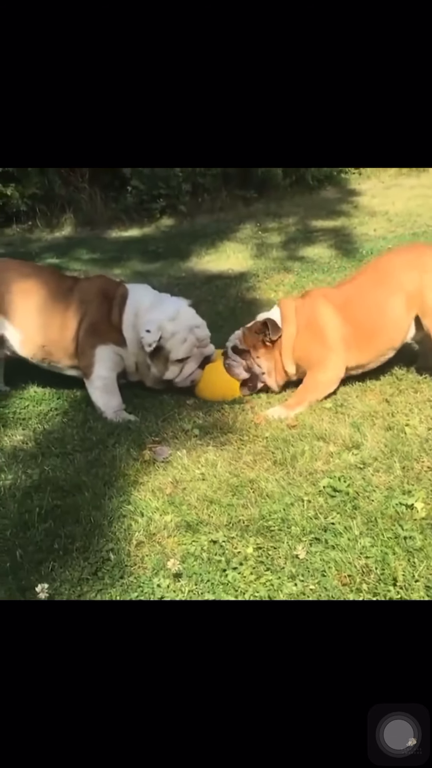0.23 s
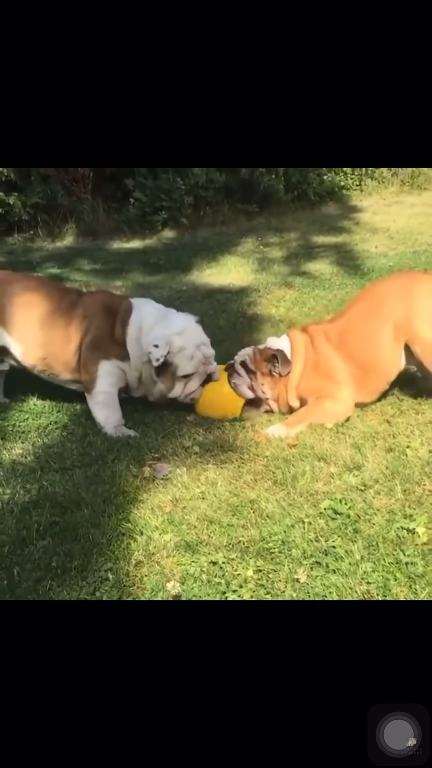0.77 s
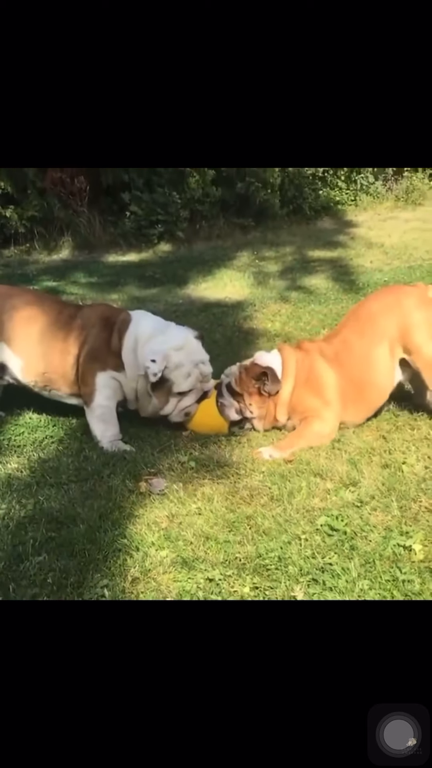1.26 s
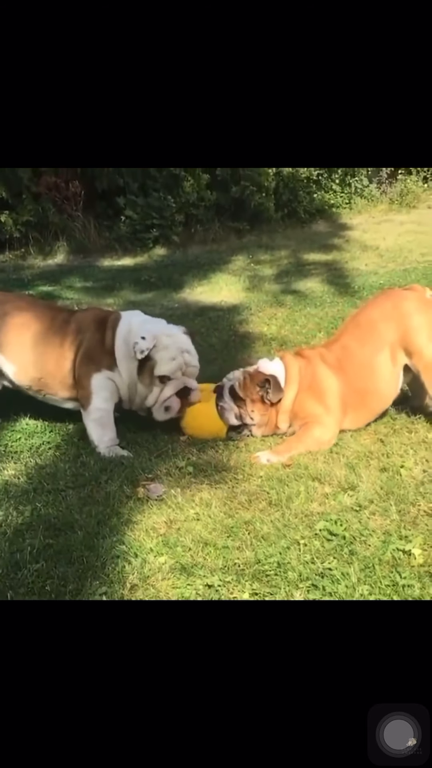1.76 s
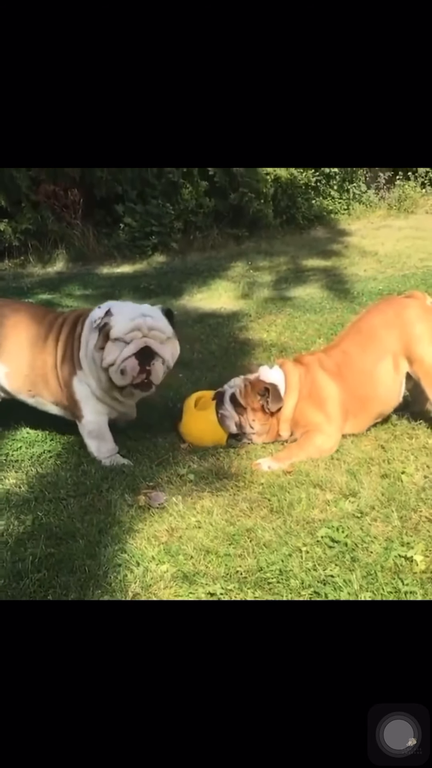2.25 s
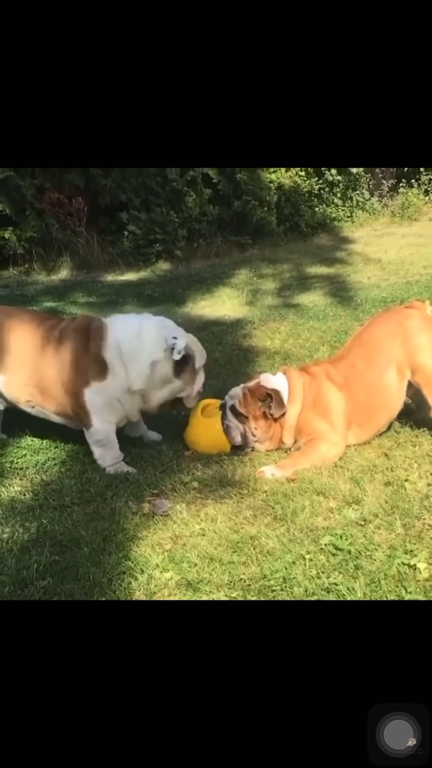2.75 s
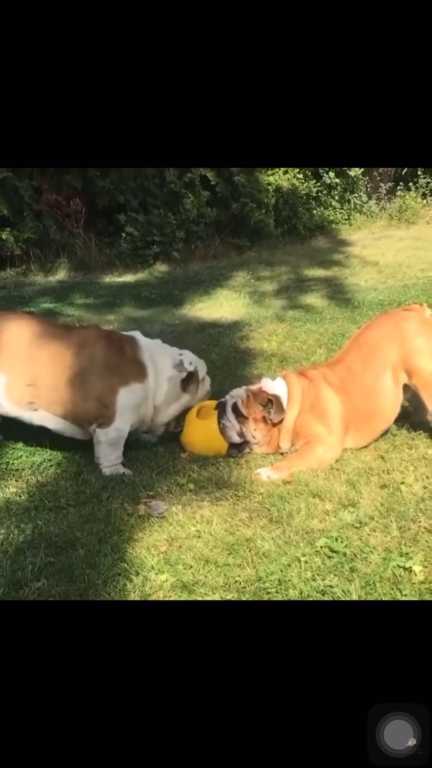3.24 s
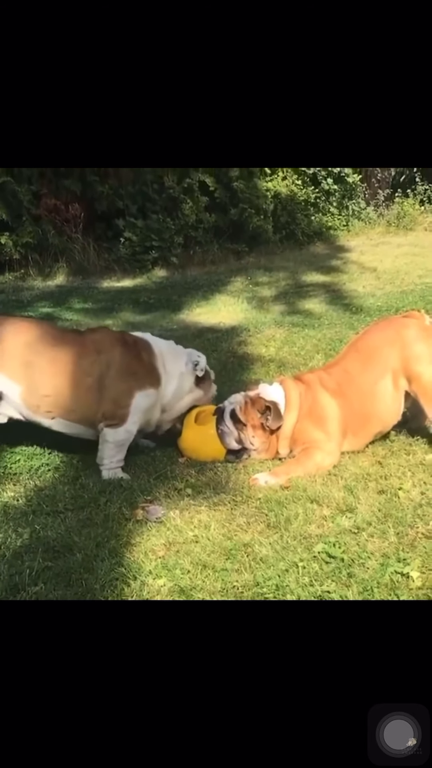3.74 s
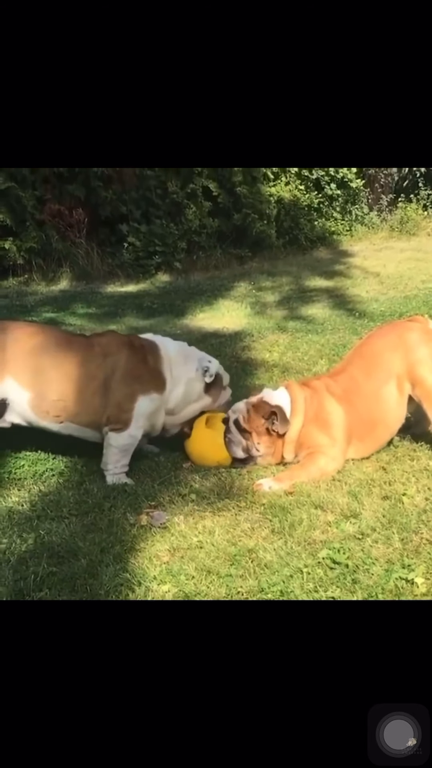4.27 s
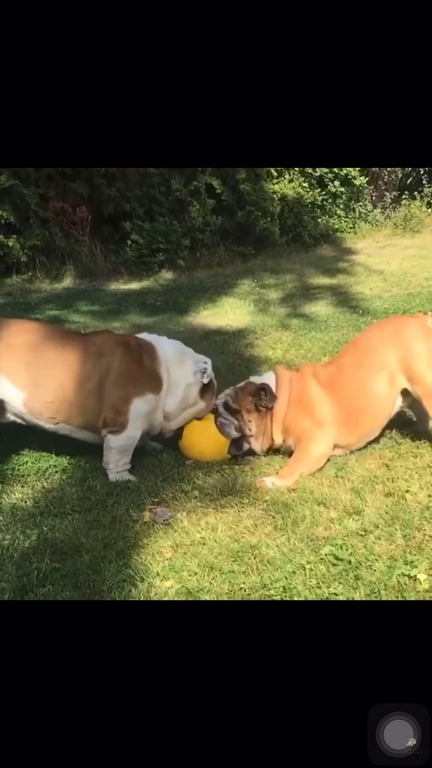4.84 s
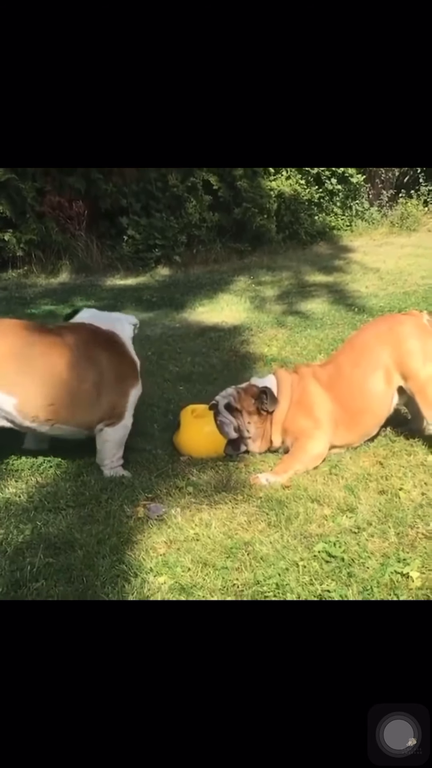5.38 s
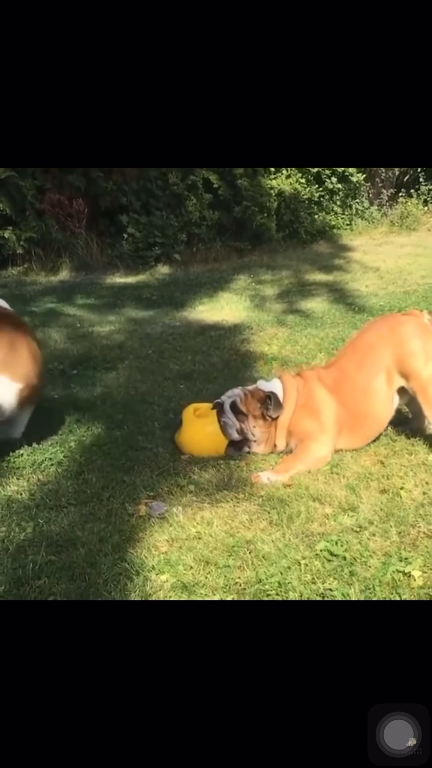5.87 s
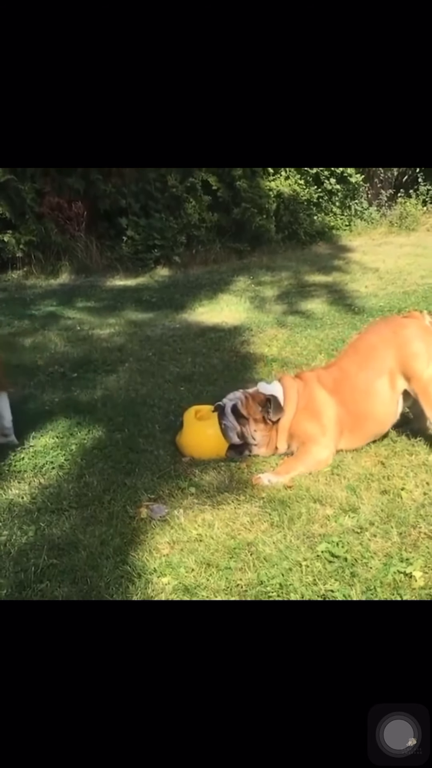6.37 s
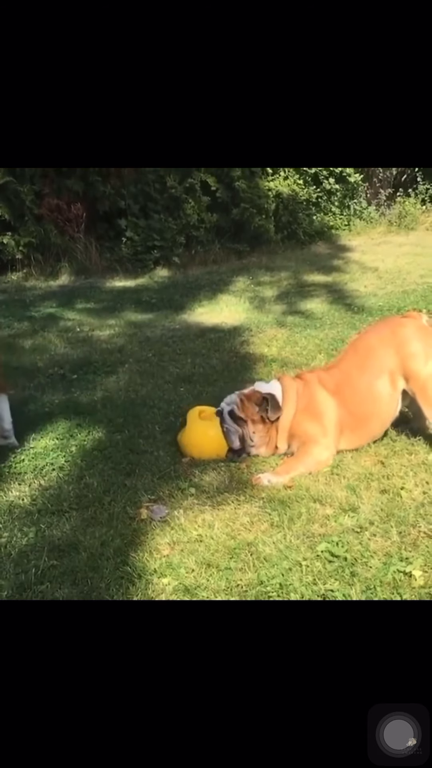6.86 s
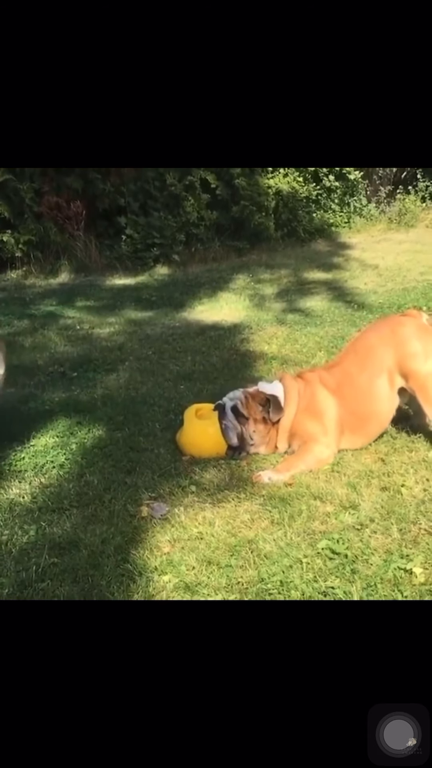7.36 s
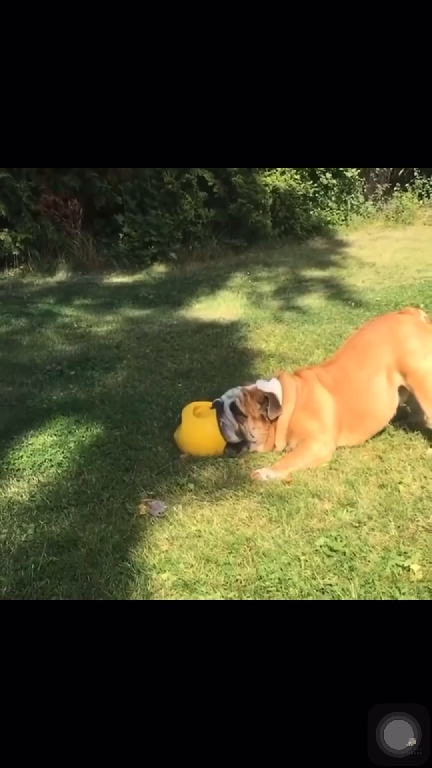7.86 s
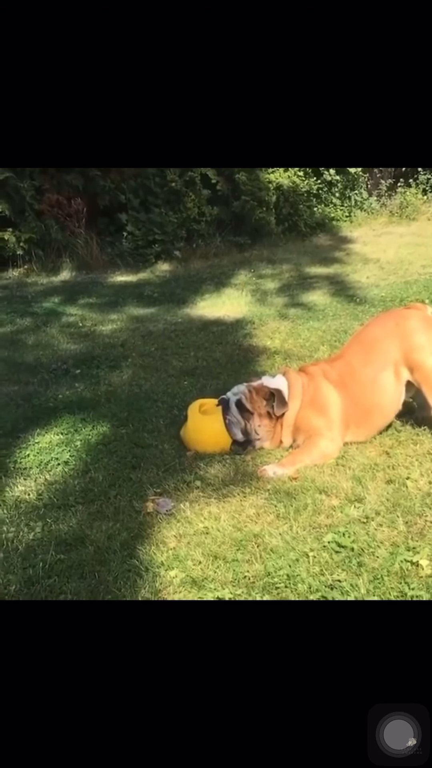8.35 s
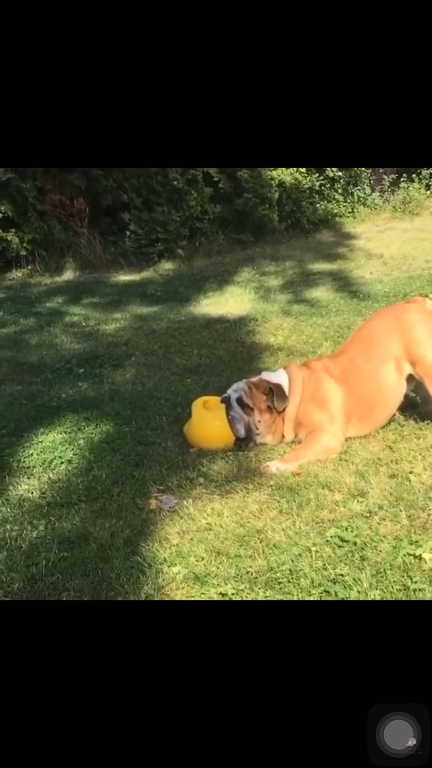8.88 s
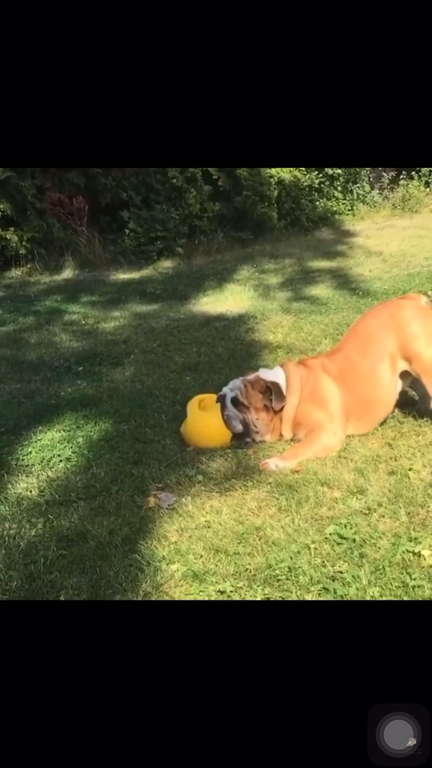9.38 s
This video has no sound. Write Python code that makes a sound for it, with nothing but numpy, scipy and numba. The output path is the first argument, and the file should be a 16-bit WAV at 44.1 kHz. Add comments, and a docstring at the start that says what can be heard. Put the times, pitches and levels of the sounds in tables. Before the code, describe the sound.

Two stocky dogs tussle over a hollow plastic ball on grass. Slow fluttering growls, wet huffs and nasal snorts come in quick bursts, with a gruff bark near the start and another midway. Short ringing teeth knocks punctuate them. The growling thins out after six seconds, then a strong growl and more snuffling return. Fairly close, dry outdoor pickup over a faint low garden rumble.

```python
"""A huff and a slow, fluttering growl come first, over a quiet garden: two bulldogs tussle over a hollow ball.
Growls are trains of throat slaps that excite chest and throat resonances, with air escaping around them.
Huffs and snorts are turbulence filtered by mouth and nose; wheezes are narrow gliding resonances.
Two gruff barks are ragged pulses and gated air in a changing mouth. Short ringing knocks are teeth on the ball
and some single hard slaps of the throat; grass crackles in proportion to the growling effort."""
import sys
import numpy as np
from scipy import signal
from scipy.fft import rfft, irfft
from scipy.io import wavfile
from scipy.ndimage import uniform_filter1d
from numba import njit

SR = 44100
rng = np.random.default_rng(int(sys.argv[2]) if len(sys.argv) > 2 else 0)


def wav_out(sig):
    """Save sig, one row per channel (or a flat mono array), as 16-bit PCM at SR to the path in sys.argv[1]."""
    wavfile.write(sys.argv[1], SR, np.round(np.clip(np.atleast_2d(sig).T, -1, 1) * 32767).astype(np.int16))


N = 424241
TIME = np.arange(N) / SR  # seconds

# Spectrum of the garden air. Each row: frequency in Hz, relative density in dB.
GARDEN_SPECTRUM = [(15, -34), (25, -6.5), (144, -1), (213, -17.5), (403, -22), (448, -28), (846, -18.5),
                   (1070, -18.5), (1260, -23), (1360, -22.5), (1680, -29.5), (12600, -41.5), (14000, -43)]
GARDEN_DB = -59.5  # mean level, about which the air wanders
GRASS_DB = -22.5  # relative to the growling effort

# Short ringing knocks: teeth on the ball, and some single hard slaps of the throat.
# Each row: start in seconds, peak level in dB before a common +2.5 dB, main ring in Hz.
SHORT_KNOCKS = [(0.49, -34.5, 890), (0.639, -31.5, 2070), (0.726, -36, 678), (0.771, -41.5, 2150),
                (1.211, -47.5, 640), (1.354, -36.5, 710), (1.379, -41.5, 750), (2.264, -51, 615),
                (2.754, -33.5, 572), (2.844, -33, 970), (2.907, -37, 2220), (3.271, -30.5, 2270),
                (3.336, -39, 2120), (3.756, -30, 1970), (4.341, -47, 620), (4.91, -47, 920),
                (4.947, -40, 910), (5.013, -33, 897), (5.534, -52, 644), (5.588, -34, 2320),
                (5.668, -37.5, 635), (5.926, -53.5, 584), (7.124, -28, 736), (7.591, -41, 637),
                (8.947, -33.5, 1150), (9.178, -38, 995), (9.212, -34.5, 964), (9.312, -34.5, 934)]
# Resonances that every knock shares. Each row: frequency in Hz, width in Hz, gain in dB.
KNOCK_MODES = [(683, 96, -3), (1760, 180, -12.5), (2054, 73, -6), (2750, 66, -12), (4150, 170, -69)]

# Wheezes of a pinched airway. Each row: start in seconds, end in seconds, frequency at the start in Hz,
# frequency at the end in Hz, level in dB.
AIRWAY_WHEEZES = [(0.94, 1.058, 680, 640, -52), (1.859, 1.966, 2120, 1750, -50), (2.5, 2.54, 830, 830, -45),
                  (2.994, 3.07, 2040, 1940, -61.5), (3.795, 3.829, 2050, 1730, -45),
                  (3.801, 3.867, 1310, 1340, -47), (4.236, 4.318, 1763, 1470, -54),
                  (4.271, 4.413, 1315, 1000, -49), (4.504, 4.63, 972, 895, -58),
                  (4.533, 4.683, 596, 537, -61), (8.413, 8.508, 1126, 1220, -43),
                  (9.49, 9.602, 1180, 1120, -48.5)]

# Huffs through mouth and nose. Each row: start, crest and end in seconds, mouth level and nose level in dB
# before chopping and mixing, first, second and third mouth resonance in Hz, strength of the first in dB.
BREATH_HUFFS = [(.01, 0.103, 0.21, -45.5, -44, 710, 1920, 3320, 4.5),
                (0.24, 0.296, 0.48, -56.5, -62, 880, 2200, 3250, 1.5),
                (0.444, 0.476, 0.6, -49.5, -58, 1030, 2120, 3400, 5.5),
                (0.56, 0.643, .77, -42.5, -48.5, 1070, 2080, 3450, 2),
                (0.857, 0.959, 1.062, -44.5, -43, 690, 1910, 3050, 2),
                (1.271, 1.376, 1.81, -65, -68, 800, 1342, 3090, 1.5),
                (1.849, 1.95, 2.026, -47, -53.5, 670, 2200, 3160, 1.5),
                (2.092, 2.173, 2.37, -59, -67.5, 440, 1800, 2300, -7),
                (2.464, 2.548, 2.596, -44, -48.5, 1130, 2250, 3200, 5),
                (2.594, 2.695, 2.908, -55.5, -41, 1050, 2040, 3380, 2),
                (2.89, 2.875, 3.08, -63, -68, 1050, 2040, 3040, -4),
                (3.094, 3.37, 3.57, -47, -63, 930, 1670, 2870, -11.5),
                (3.598, 3.64, 3.69, -49, -60, 660, 1550, 2910, -22),
                (3.699, 3.753, 3.88, -43.5, -53, 830, 1560, 2770, -7),
                (3.943, 4.06, 4.15, -55.5, -69.5, 650, 1500, 3620, -9.5),
                (4.135, 4.275, 4.43, -52, -69, 450, 1620, 2230, -0.5),
                (4.534, 4.705, 4.86, -55, -56, 1100, 1480, 2200, 2),
                (4.823, 4.843, 5.3, -55, -64, 924, 1780, 3400, 1.5),
                (5.33, 5.357, 5.62, -55.5, -58.5, 960, 2100, 3470, 1.5),
                (5.525, 5.626, 5.765, -47, -49, 770, 2220, 3300, -7),
                (5.925, 5.98, 6.67, -65, -68.5, 930, 2267, 3360, -1),
                (6.924, 6.986, 7.26, -52, -45, 810, 2000, 3290, -1),
                (7.046, 7.141, 7.27, -47, -69, 920, 2000, 3330, 0),
                (7.38, 7.508, 7.52, -70, -67, 740, 1921, 3401, 0),
                (7.53, 7.57, 7.74, -55.5, -60, 656, 1920, 3500, -0.5),
                (7.739, 7.796, 7.93, -55.5, -61.5, 900, 1800, 3480, 2),
                (7.887, 7.96, 8.03, -42.5, -46, 1150, 1790, 3400, 2),
                (8.095, 8.272, 8.33, -51.5, -56, 1030, 2280, 2570, 4),
                (8.375, 8.446, 8.57, -43.5, -48.5, 980, 2360, 3620, 4),
                (8.562, 8.596, 8.8, -47.5, -49.5, 1000, 2300, 3545, 0.5),
                (8.876, 8.942, 9.04, -45, -50, 1030, 2280, 3380, 4),
                (9.082, 9.2, 9.33, -46.5, -57.5, 1043, 2119, 3600, -1.5),
                (9.3, 9.334, 9.385, -52, -61, 1050, 2120, 3700, 8),
                (9.46, 9.57, 9.6, -44, -45, 1104, 2110, 3830, 9.5)]
MOUTH_TOP_HZ = 4280  # centre of the fourth mouth resonance
# Strengths of the second, third and fourth mouth resonances in dB, before blowing and closing shift them.
MOUTH_UPPER_STRENGTHS = (-1, -6.5, -15.5)
CLOSING_TRADE = 0.36  # dB gained by the top resonance for each dB that a closing mouth takes from the first
BRIGHTEN = 0.24  # dB gained by the third mouth resonance for each dB of harder blowing
# Spectrum of air in the nostrils. Each row: frequency in Hz, relative density in dB.
NOSE_SPECTRUM = [(1470, -2.5), (2500, -2.5), (3340, -4), (4510, -8.5), (5600, -9), (11900, -14),
                 (13400, -19.5), (14000, -12.5)]
BARK_NOSE_DB = -21  # air that a bark drives through the nose, relative to the bark
MOUTH_CHOP, NOSE_CHOP = 14.6, 6.5  # how deeply each slap of the throat chops the air

# Growls. Each row: start, crest and end in seconds, effort in dB, flutter rate at the start and at the end
# in Hz, unevenness of the cycle length from 0 to 1, rasp in dB, chest boom in dB.
THROAT_GROWLS = [(0.033, 0.153, 0.348, -42, 22.5, 21.8, 0.01, -2.5, -2),
                 (.395, 0.442, 0.57, -40, 21.7, 23, .04, 0.5, -.5),
                 (0.578, 0.667, .755, -35, 31.8, 34, 0.05, -5, 1),
                 (0.836, 0.84, 1.06, -44.5, 22, 19.5, .15, -8.5, -1),
                 (1.187, 1.407, 1.58, -44.5, 38, 46, 0.17, 0, 0),
                 (1.6, 1.598, 1.765, -52.5, 46, 48, 0.25, 0, -3),
                 (1.884, 1.894, 1.99, -47.5, 28.6, 27, 0.22, -3, -2.5),
                 (2.482, 2.554, 2.61, -51, 30, 34, 0.26, -3.5, -2.5),
                 (2.653, 2.834, 2.88, -37.5, 32.5, 27, 0.12, -2.5, -3),
                 (2.931, 2.934, 3.07, -52.5, 23.6, 29, 0.16, -0.5, -3.5),
                 (3.13, 3.427, 3.58, -48, 51.3, 50, 0.22, 1.5, 0),
                 (3.609, 3.759, 3.86, -45.5, 50, 49.6, 0.27, 1, 0),
                 (4.041, 4.062, 4.075, -50.5, 44, 57, 0.1, -7, 3),
                 (4.168, 4.3, 4.49, -47.5, 41, 46, 0.15, 0, -1.5),
                 (4.489, 4.78, 4.83, -43.5, 48, 47.5, 0.14, -5.5, -0.5),
                 (4.861, 5.152, 5.32, -42, 20.5, 20.2, 0.06, -3, -3),
                 (5.355, 5.358, 5.51, -43.5, 34.4, 37, 0.18, -6, 0),
                 (5.536, 5.54, 5.765, -39, 23, 22.3, 0.08, -3, -2.5),
                 (5.919, 5.93, 5.955, -55, 30, 30, 0.2, 2, -4),
                 (7.019, 7.145, 7.34, -31.5, 33.7, 42, 0.06, -1.5, -5),
                 (7.59, 7.589, 7.65, -48, 41.4, 37, 0.17, 5.5, -2.5),
                 (7.792, 7.968, 8.005, -51, 40.2, 41, 0.16, -4.5, -0.5),
                 (8.151, 8.313, 8.315, -54.5, 41, 40, 0.08, -6.5, 0.5),
                 (8.388, 8.415, 8.51, -52, 42, 39, 0.13, 1.5, 0.5),
                 (8.608, 8.733, 8.87, -36, 27.7, 31.5, .02, -3, -3.5),
                 (8.882, 8.945, 9.24, -41.5, 18, 25, 0.02, -7.5, -1),
                 (9.312, 9.32, 9.39, -41, 15.6, 8.8, 0.07, -8, -6),
                 (9.471, 9.52, 9.62, -47.5, 36, 34, .1, -7.5, 2)]
# Resonances of the chest. Each row: frequency in Hz, width in Hz, level in dB.
CHEST_MODES = [(84, 47.3, 5.5), (126.3, 205, 0)]
# Resonances of the throat. Each row: mean frequency in Hz, width in Hz, gain in dB.
THROAT_MODES = [(359, 320, -6), (652, 144, 5.5), (1000, 500, -5), (2200, 280, -10.5), (3300, 190, -13)]
FLAP_DB = -8.5  # tissue ring, before harder growls raise it

# The two barks, one list of time points each. Each row: time in seconds, level in dB, pitch in Hz,
# first resonance in Hz, second resonance in Hz, shift of the upper resonances in dB.
BARK_TRACKS = [
    [(.377, -66, 110.1, 1248, 2580, -16), (.386, -28, 83.15, 1125, 2590, -1.5),
     (.404, -34, 83.5, 1120, 2090, 4), (.409, -19.5, 83, 1080, 2210, -28), (.418, -32, 84, 1040, 2150, -20),
     (.436, -29, 84, 1000, 2200, -18), (.455, -62, 82.5, 980, 2100, -14)],
    [(4.705, -64, 93.1, 770, 1740, 2), (4.718, -33, 91.2, 756, 1790, -0.5),
     (4.735, -25, 86.3, 737, 1700, 3), (4.75, -20, 72.05, 716, 1750, -38),
     (4.77, -27.5, 84.3, 630, 1570, 4), (4.787, -26.5, 119.1, 660, 1450, 9.5),
     (4.805, -24, 85.5, 716, 1670, 2), (4.813, -33, 86, 860, 1920, -42), (4.83, -45, 76, 875, 2010, 3)],
]

# Every push of the lungs swells to a crest, sags and dies away.
ATTACK_S, RELEASE_S, NOSE_RELEASE_S = 0.011, 0.014, 0.018  # time constants of the edges
GROWL_RISE_DB, GROWL_SAG_DB = 7, 6.5
MOUTH_RISE_DB, MOUTH_SAG_DB = 5.5, 9
NOSE_RISE_DB, NOSE_SAG_DB = 12, 11
TOP_HZ = 14100  # upper edge of the pass band


def undb(db):
    """Amplitude gain is an exponential function of level in decibels."""
    return 10 ** (np.asarray(db) / 20)


def unit(x):
    """Normalisation by the root mean square gives a sound unit power."""
    return x / (np.sqrt(np.mean(x ** 2)) + 1e-12)


def curves(rows):
    """Linear interpolation turns each column after the time column into a line through time."""
    s, *columns = np.transpose(rows)
    return [np.interp(TIME, s, column) for column in columns]


def walk(rate):
    """Averaging held random steps yields a smooth wandering of unit rms; rate in steps per second."""
    k = int(SR / rate)
    steps = np.repeat(rng.standard_normal(N // k + 1), k)
    return unit(uniform_filter1d(steps, k)[:N])


def noise():
    """Turbulence is modelled as white Gaussian noise."""
    return rng.standard_normal(N)


def colour(x, points):
    """Spectral weighting by (Hz, dB) points, interpolated over log frequency, shapes a sound of unit rms."""
    hz, db = np.transpose(points)
    f = np.maximum(np.fft.rfftfreq(N, 1 / SR), 1)
    gain = undb(np.interp(np.log(f), np.log(hz), db))
    return unit(irfft(rfft(x) * gain, N))


def cut(x, hz, kind, order=2):
    """A Butterworth filter, low-pass or high-pass, removes one side of the spectrum."""
    sos = signal.butter(order, min(hz, SR / 2 - 1), kind, fs=SR, output="sos")
    return signal.sosfilt(sos, x + 1e-18)


@njit
def svf(x, hz, width):
    """A state-variable band-pass is a resonator whose centre may move, with gain 1 at the centre."""
    y, band, low = np.empty(len(x)), 0., 0.
    for i in range(len(x)):
        g, k = np.tan(np.pi * hz[i] / SR), width / hz[i]
        v = (band + g * (x[i] + 1e-18 - low)) / (1 + g * (g + k))
        band, low, y[i] = 2 * v - band, low + 2 * g * v, k * v
    return y


def ring(x, modes):
    """A resonant body responds as the sum of parallel (Hz, width in Hz, dB) modes."""
    return sum(undb(db) * svf(x, hz + np.zeros(len(x)), float(width)) for hz, width, db in modes)


def formant(x, hz, width):
    """Two resonators in cascade give a vocal-tract resonance steep sides and dark valleys."""
    hz = hz + np.zeros(len(x))
    return svf(svf(x, hz, float(width)), hz, 2. * width)


def fade(x, seconds):
    """First-order decay gives every pulse an exponential tail."""
    return signal.lfilter([1], [1, -np.exp(-1 / (seconds * SR))], x + 1e-18)


def swell(start, crest, end, rise_db, sag_db, release_s):
    """Lung pressure sets the gain of one push: attack, rise to a crest, sag, exponential release."""
    gain = np.zeros(N)
    near = slice(*np.searchsorted(TIME, [start - .1, end + .3]))
    t = TIME[near]
    body_db = np.interp(t, [start, np.clip(crest, start, end), end], [-rise_db, 0, -sag_db])
    attack = np.minimum(t - start, 0) / ATTACK_S
    release = np.minimum(end - t, 0) / release_s
    gain[near] = undb(body_db) * np.exp(attack + release)
    return gain


def flaps(start, end, rate, uneven, scatter_db):
    """Relaxation oscillation: tissue slaps shut at a moving rate, each cycle with its own length and force."""
    pulses, s = np.zeros(N), start
    for stretch, force in rng.standard_normal((128, 2)):
        if s >= min(end, TIME[-1]):
            break
        i = max(int(s * SR), 0)
        # dividing by the root of the rate keeps the power independent of it
        pulses[i] = undb(scatter_db * force) / np.sqrt(rate[i])
        s += np.exp(uneven * stretch) / rate[i]
    return pulses


def flutter():
    """Flutter of slack throats yields the effort, chest boom, slaps, air per slap and air between slaps."""
    effort, boom, slaps, leaks, murmur = np.zeros((5, N))
    for start, crest, end, db, first, last, uneven, rasp_db, boom_db in THROAT_GROWLS:
        push = undb(db) * swell(start, crest, end, GROWL_RISE_DB, GROWL_SAG_DB, RELEASE_S)
        effort += push
        boom += undb(boom_db) * push
        rate = np.interp(TIME, [start, end], [first, last])
        bout = flaps(start, end, rate, uneven, scatter_db=2.2)
        slaps += bout
        leaks += undb(rasp_db) * bout
        murmur += undb(rasp_db) * uneven * bout  # a ragged flutter never seals
    return effort, boom, slaps, leaks, murmur


def chop(leaks, depth):
    """Flow modulation: the fluttering throat holds the air back and lets out one puff at each slap."""
    gate = 1 + depth * uniform_filter1d(fade(leaks, .003), 220)
    return gate / np.sqrt(uniform_filter1d(gate ** 2, 3000))


def garden():
    """Distant sources merge into shaped noise, a low rumble and soft leaves, with one thin bird note."""
    air = colour(noise(), GARDEN_SPECTRUM) * undb(GARDEN_DB + walk(7))
    # two narrow resonances in cascade turn noise into a whistle
    whistle = ring(ring(noise(), [(6540, 49, 0)]), [(6530, 54, 0)])
    bird = unit(whistle) * np.exp(-((TIME - 6.75) / 0.051) ** 2)
    return air + undb(-81) * bird


def grass(effort):
    """Random impulses model blades crackling under paws and ball, louder the harder the dogs strain."""
    ticks = (rng.random(N) < 300 / SR) * noise()  # 300 a second on average
    bursts = uniform_filter1d(np.abs(ticks), 110) * noise()
    crackle = ring(bursts, [(2800, 3000, 0), (7500, 6000, -6)])
    return unit(crackle) * effort * undb(GRASS_DB)


def knocks():
    """Impact excitation: a short noisy contact with a weak tail sets damped resonances ringing briefly."""
    out, t = np.zeros(2 * N), TIME[:4096]
    for s, db, hz in SHORT_KNOCKS:
        onset = t / 0.0018
        strike = onset * np.exp(-onset)
        tail = 0.11 * np.exp(-t / 0.011)
        contact = rng.standard_normal(len(t)) * (strike + tail)
        hit = ring(contact, KNOCK_MODES + [(hz, 170, 4)])
        i = int(s * SR)
        out[i:i + len(t)] += undb(db + 2.5) * hit / np.abs(hit).max()
    return out[:N]


def wheezes():
    """A jet through a pinched airway excites one narrow, gliding resonance."""
    out = np.zeros(N)
    for start, end, first_hz, last_hz, db in AIRWAY_WHEEZES:
        i, j = int(start * SR), min(int(end * SR), N)
        hz = np.geomspace(first_hz, last_hz, j - i)
        tone = formant(rng.standard_normal(SR)[:j - i], hz, 90)
        out[i:j] += undb(db) * unit(tone * signal.windows.tukey(j - i, .5))
    return out


def snorts():
    """Constriction noise: with every huff and bark, air forced through narrow nostrils hisses and sputters."""
    flow = 0
    for start, crest, end, _, db, *_ in BREATH_HUFFS:
        flow = flow + undb(db) * swell(start, crest, end, NOSE_RISE_DB, NOSE_SAG_DB, NOSE_RELEASE_S)
    for rows in BARK_TRACKS:
        s, db, *_ = np.transpose(rows)
        flow = flow + np.interp(TIME, s, undb(db + BARK_NOSE_DB), left=0, right=0)
    hiss = cut(colour(noise(), NOSE_SPECTRUM), 3300, "high")
    return flow * unit(hiss * undb(1.5 * walk(220)))


def huffs():
    """Source and filter: air fluttering past wet lips rings a mouth whose shape follows the huffs."""
    flow, shapes = 0, []
    for start, crest, end, db, _, *shape in BREATH_HUFFS:
        flow = flow + undb(db) * swell(start, crest, end, MOUTH_RISE_DB, MOUTH_SAG_DB, RELEASE_S)
        shapes += [(start, *shape), (end, *shape)]
    *centres, first_db = curves(shapes)
    air = noise() * undb(2.3 * walk(130))
    second_db, third_db, top_db = MOUTH_UPPER_STRENGTHS
    third_db = third_db + BRIGHTEN * np.clip(20 * np.log10(flow + 1e-9) + 52, -10, 10)
    top_db = top_db - CLOSING_TRADE * first_db
    centres = (*centres, MOUTH_TOP_HZ)
    widths = (270, 320, 400, 560)  # Hz
    strengths = (first_db, second_db, third_db, top_db)
    voice = 0
    for hz, width, db in zip(centres, widths, strengths):
        hz = hz * (1 + .045 * walk(28))
        voice = voice + undb(db + 2 * walk(30)) * formant(air, hz, width)
    spill = cut(cut(air, 790, "high"), 1500, "low")
    return flow * unit(voice + spill / 8)


def growls(effort, boom, slaps, leaks, murmur):
    """Pulse excitation: slow throat slaps thump the chest, and a rasp of air escapes around each one."""
    thump = sum(undb(db) * unit(formant(-slaps, hz, width)) for hz, width, db in CHEST_MODES)
    rumble = unit(ring(formant(noise(), 130, 240), [(109, 158, 0)]))
    chest = cut(unit(thump) + undb(-1.0) * rumble, 64, "high", order=3)
    # the flap of tissue rings at a wandering pitch, so it changes from slap to slap
    flap_hz = 270 * 2 ** np.clip(.3 * walk(30), -1, 1)
    flap = unit(formant(slaps, flap_hz, 260))
    # the air swells up to each slap, bursts with it and dies away
    burst = unit(uniform_filter1d(fade(leaks, .002), 200))
    lead = unit(uniform_filter1d(fade(leaks, .004), 900))
    steady = unit(uniform_filter1d(murmur, 2000))
    air = (burst + 1.3 * lead + 1.04 * steady) * noise()
    rasp = 0
    for hz, width, db in THROAT_MODES:
        rasp = rasp + undb(db) * formant(air, hz * (1 + walk(25) / 14), width)
    spit = cut(cut(air, 400, "high"), 4000, "low", order=1)
    breath = unit(rasp + undb(-32) * spit)
    # a harder growl snaps more and booms less
    hard_db = .25 * np.clip(20 * np.log10(effort + 1e-9) + 48, -10, 10)
    snap = undb(FLAP_DB + hard_db) * flap
    return boom * undb(-2.0 - hard_db) * chest + effort * (snap + undb(-11.0) * breath)


def bark(rows):
    """Source and filter: a gruff snap of ragged pulses and gated air rings a quickly changing mouth."""
    level_db, pitch, f1, f2, upper_db = curves(rows)
    start, end = rows[0][0], rows[-1][0]
    sounding = (TIME > start) & (TIME < end)
    pulses = flaps(start, end, pitch, uneven=0.0434, scatter_db=4.5)
    gate = uniform_filter1d(fade(pulses, .005), 150)
    source = 0.41 * unit(pulses) + unit(gate * noise())
    # each mode: Hz, width in Hz, dB
    modes = [(240, 220, -10), (f1, 170, 0), (1.1 * f1, 130, -4),
             (f2, 280, upper_db - 10), (3450, 600, upper_db - 22.5)]
    voice = sum(undb(db) * formant(source, hz, width) for hz, width, db in modes)
    voice = voice + undb(-29) * cut(cut(source, 250, "high"), 2400, "low")
    # the push of the lungs sets the loudness, however ragged the cycles are
    power = np.maximum(uniform_filter1d(voice ** 2, 700), 0) + .01 * np.var(voice[sounding])
    return voice / np.sqrt(power) * undb(level_db)


def scene():
    """Superposition in open air: one soft turf reflection follows the direct sound of dogs and knocks."""
    effort, boom, slaps, leaks, murmur = flutter()
    mouth = 0.89 * chop(leaks, MOUTH_CHOP) * huffs()
    nose = chop(leaks, NOSE_CHOP) * snorts()
    barks = sum(bark(rows) for rows in BARK_TRACKS)
    near = growls(effort, boom, slaps, leaks, murmur) + mouth + nose + wheezes() + barks + knocks()
    # the reflection is dulled and arrives 1.2 ms late
    turf = np.interp(TIME - .0012, TIME, cut(near, 1400, "low", order=1), left=0)
    return (near + undb(-14) * turf + grass(effort) + garden())[None]


def record(dry):
    """Band limiting: a steep elliptic low-pass removes the top of the spectrum."""
    return signal.sosfilt(signal.ellip(10, .2, 80, TOP_HZ, fs=SR, output="sos"), dry)


dry = scene()
out = record(dry)
wav_out(out)
```